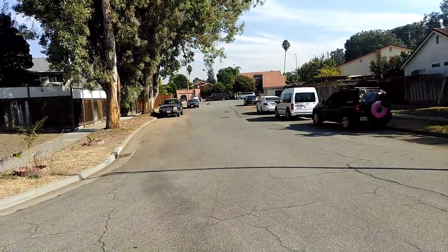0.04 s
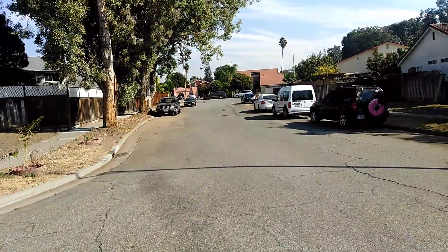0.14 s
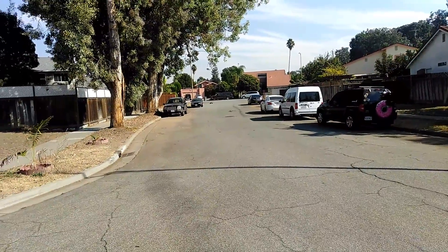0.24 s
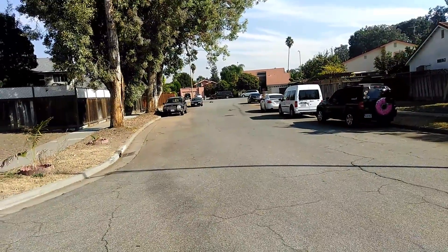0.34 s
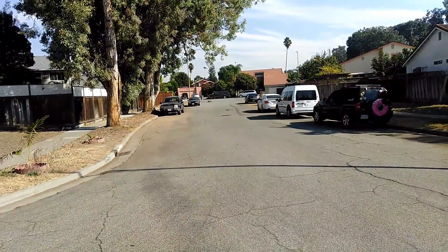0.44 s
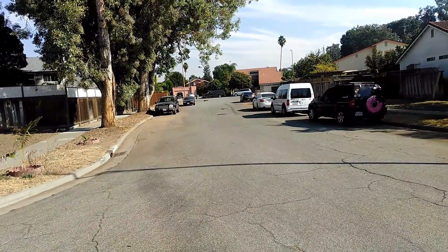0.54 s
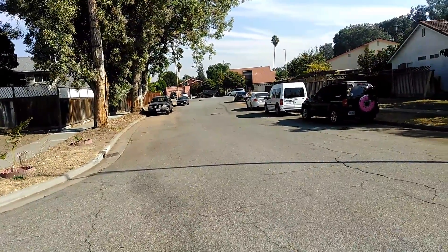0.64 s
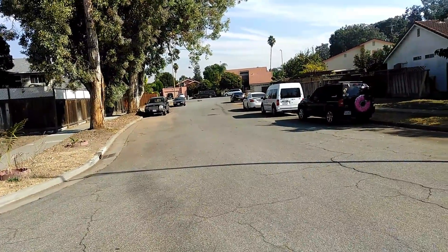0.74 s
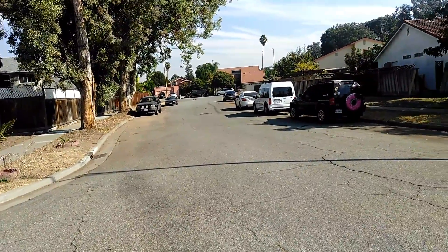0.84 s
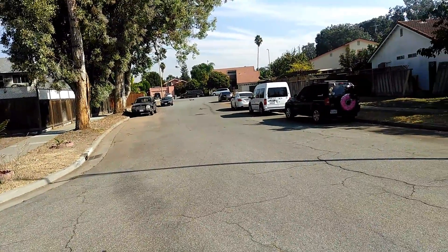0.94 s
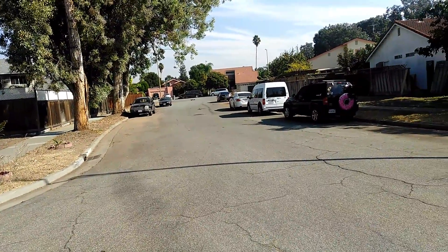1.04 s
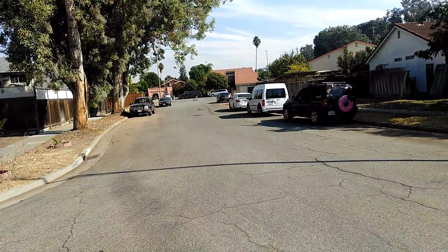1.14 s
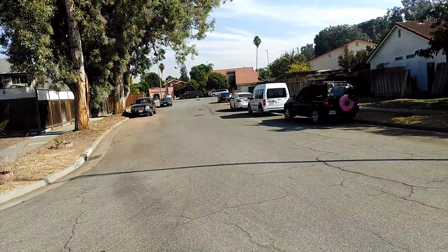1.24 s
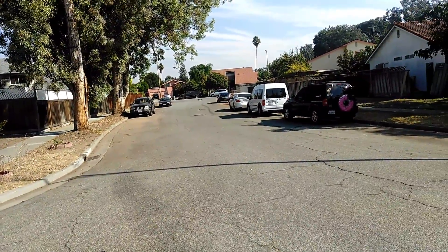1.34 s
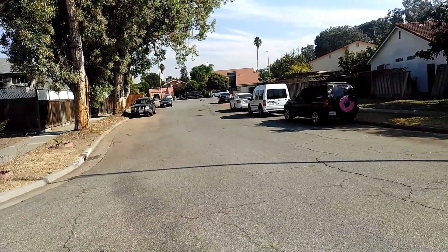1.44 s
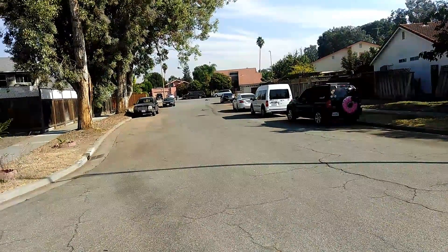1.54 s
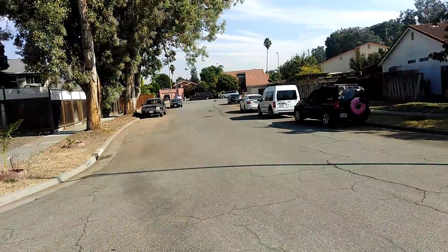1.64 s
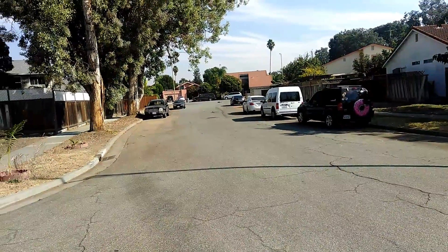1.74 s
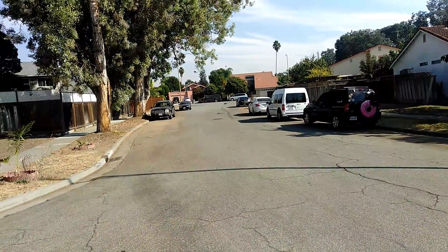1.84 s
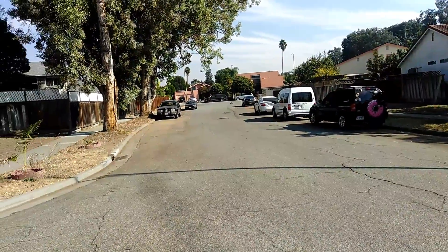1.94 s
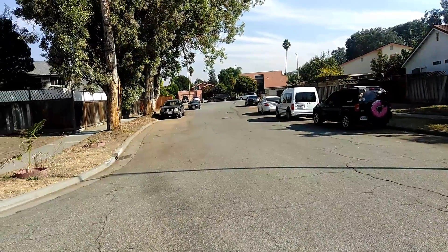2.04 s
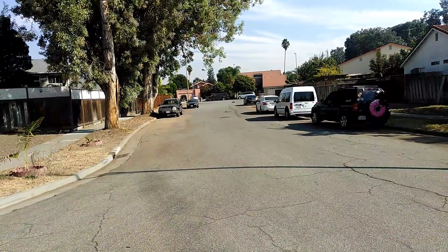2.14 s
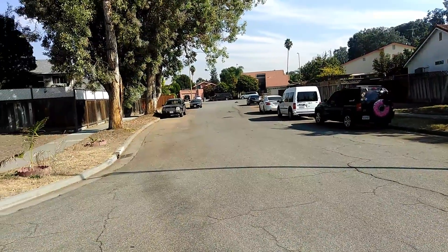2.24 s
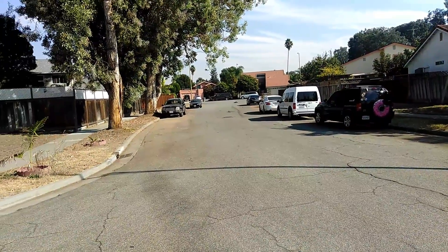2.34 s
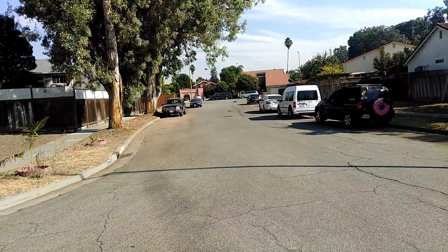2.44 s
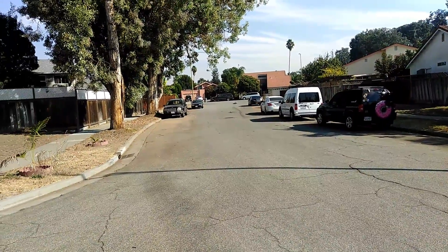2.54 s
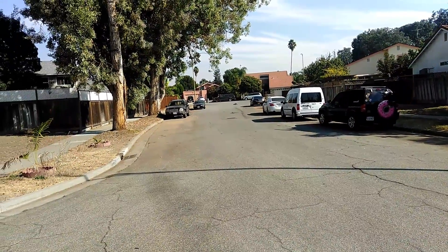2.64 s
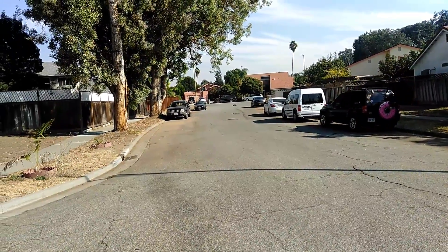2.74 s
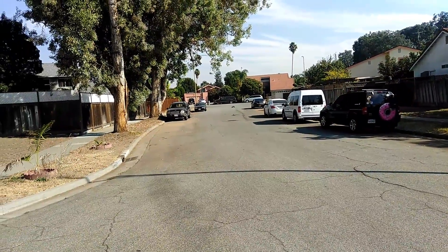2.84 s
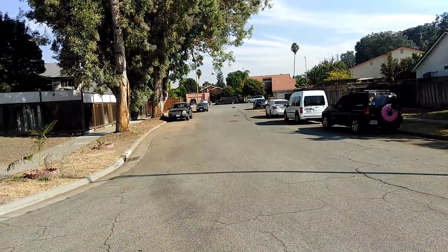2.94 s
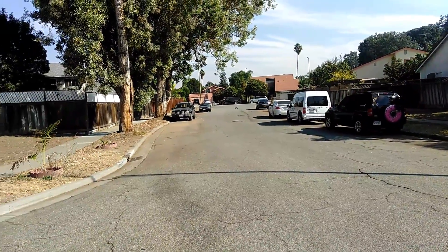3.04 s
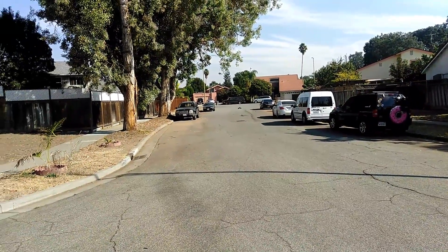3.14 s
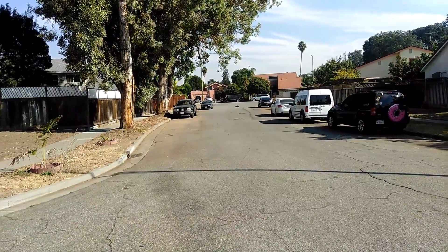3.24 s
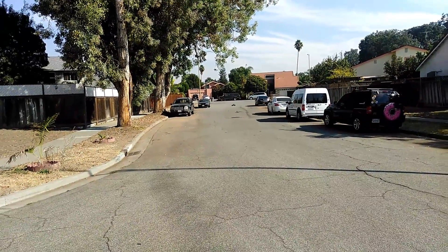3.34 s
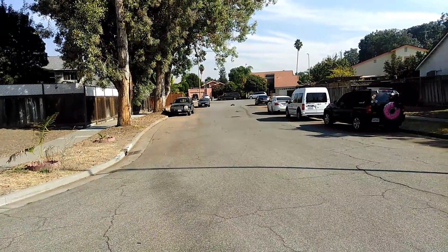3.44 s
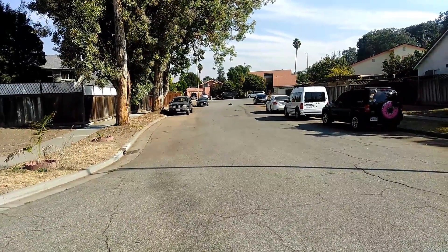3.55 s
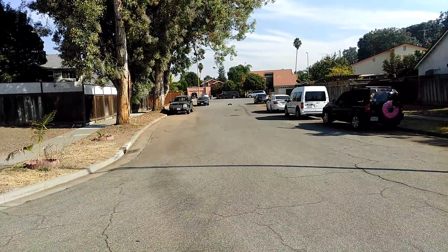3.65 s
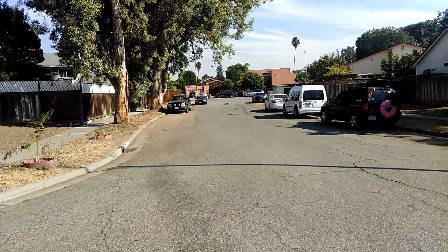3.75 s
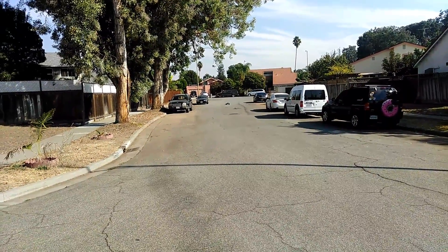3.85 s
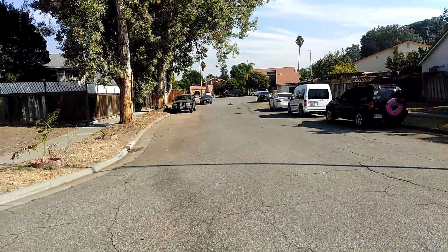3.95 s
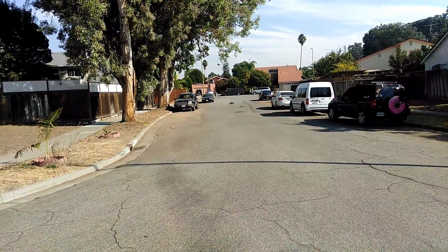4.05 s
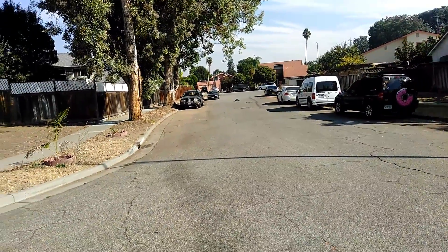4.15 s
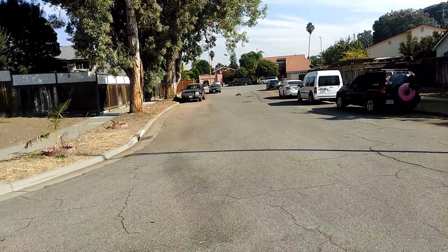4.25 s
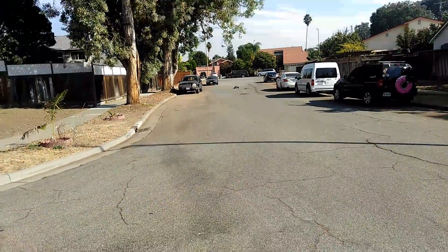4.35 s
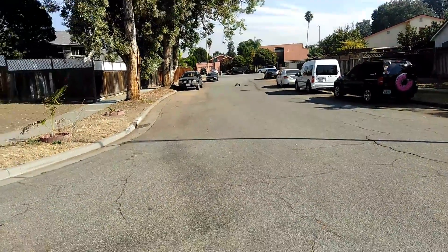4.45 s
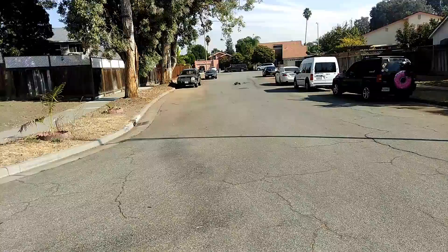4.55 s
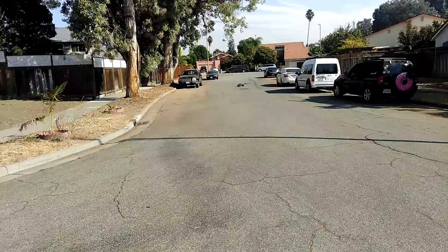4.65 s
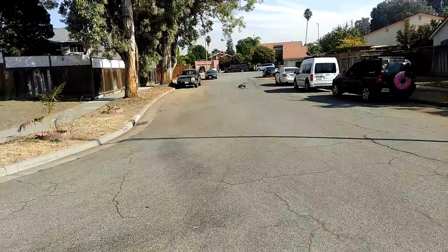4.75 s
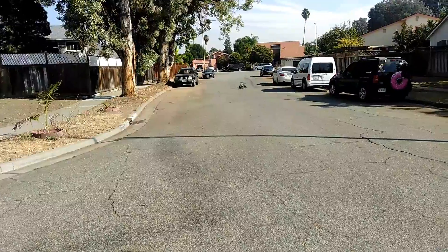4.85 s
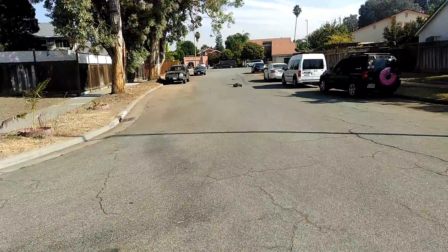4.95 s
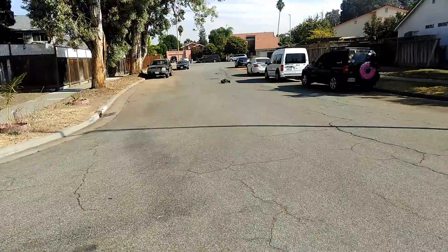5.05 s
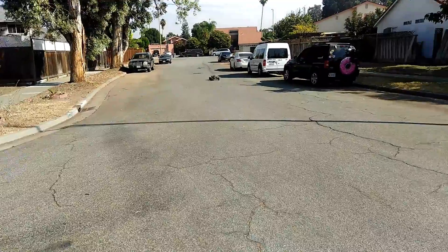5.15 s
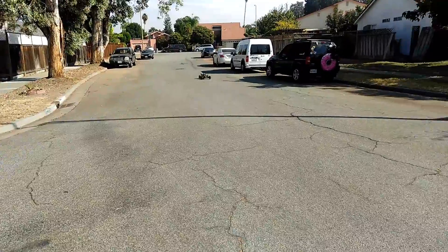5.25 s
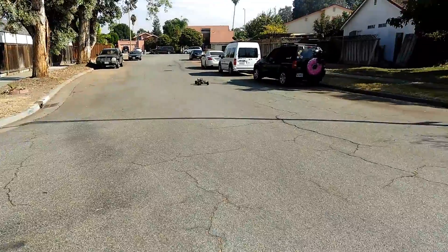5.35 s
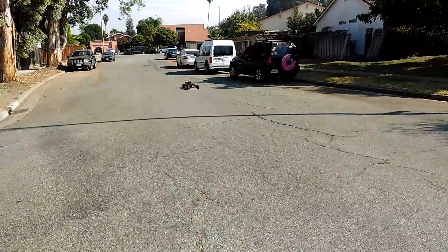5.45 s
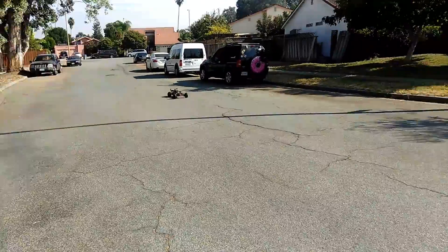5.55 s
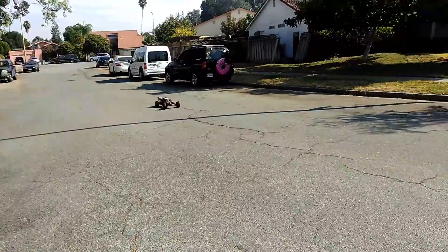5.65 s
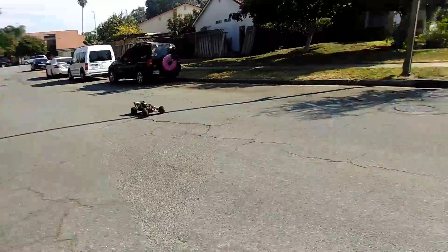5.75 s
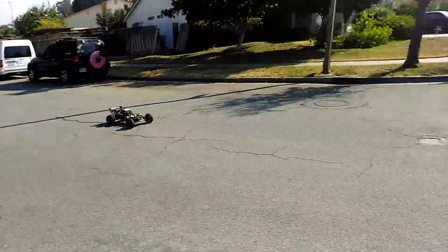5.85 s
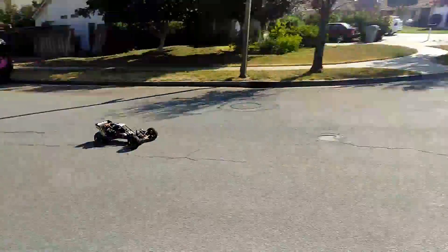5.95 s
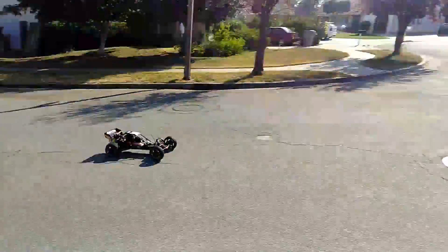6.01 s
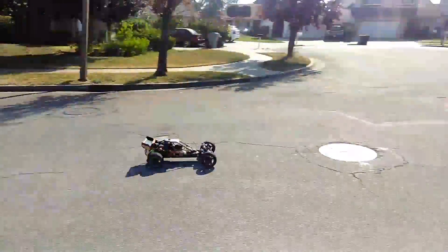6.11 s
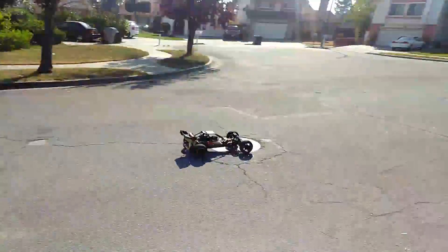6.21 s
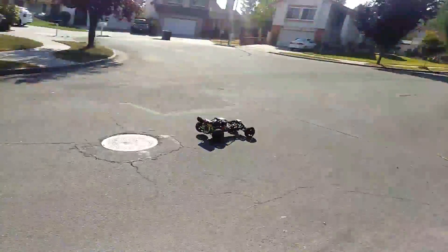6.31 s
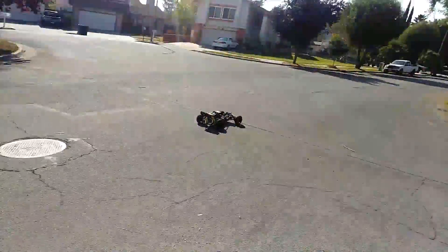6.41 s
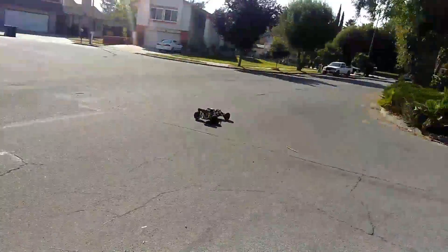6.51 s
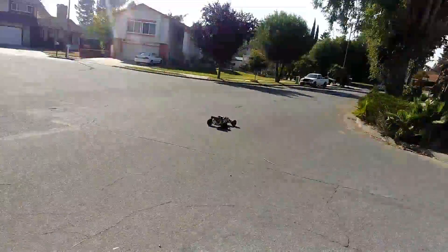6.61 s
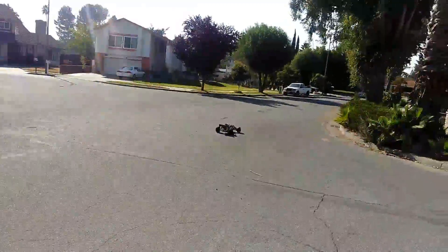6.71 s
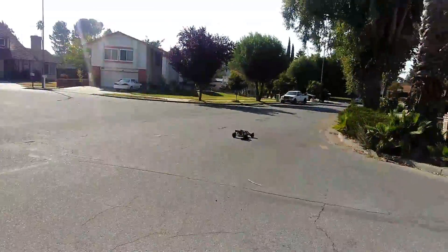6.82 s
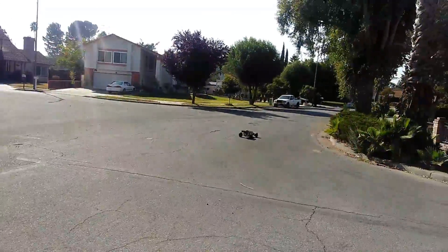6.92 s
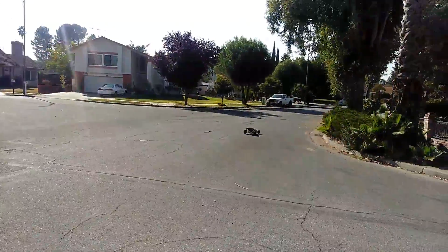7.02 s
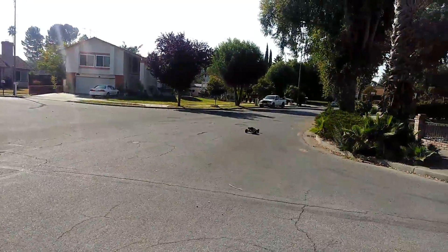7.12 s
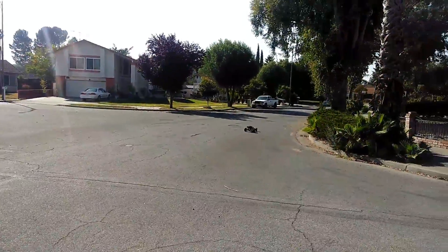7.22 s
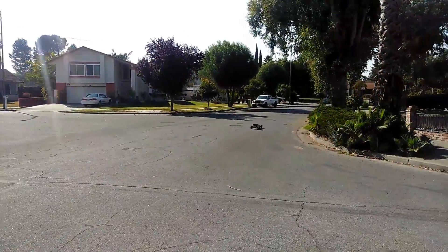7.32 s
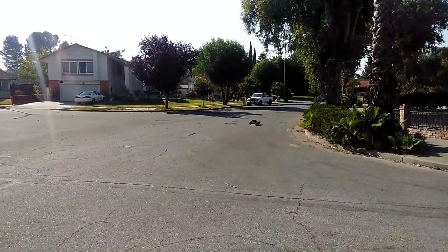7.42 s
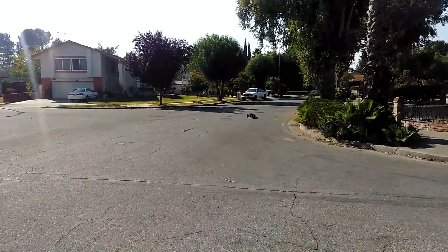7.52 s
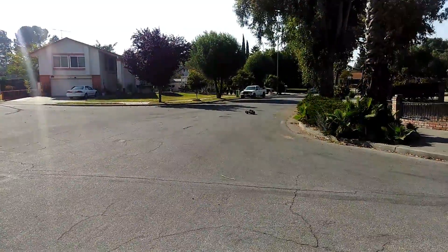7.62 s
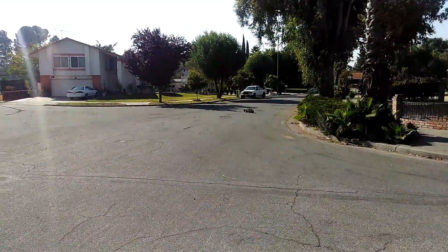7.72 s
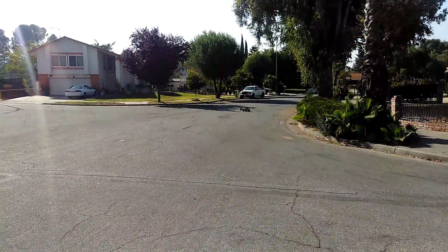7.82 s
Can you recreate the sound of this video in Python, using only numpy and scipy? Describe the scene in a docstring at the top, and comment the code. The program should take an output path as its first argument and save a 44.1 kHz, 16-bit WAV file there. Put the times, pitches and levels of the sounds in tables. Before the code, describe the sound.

Outdoors on a quiet house-lined street, a dull murmur of traffic and leaves with a faint steady mid-low hum and light breeze. From 0 to 2 seconds a distant small two-stroke engine sputters: isolated dry pops, short uneven runs of firings, strongest around 0.5 to 0.85, with a thin brake squeal near 0.6, all ringing off the houses. At about 2.1 the throttle snaps open with a gulp and the pitch jumps up. From 2.3 to 5.5 the buzz climbs, hollow and echoing at first, then louder, brighter and raspier, wavering with reflections. Around 5.9 to 6.3 it screams past close, loudest, with low wind thumps and tyre roar, its pitch sliding down. Brief shrill metallic ringing comes at 6.8 to 7.0. It recedes, lower and weaker, the street echo returning; treble vanishes after 7.5, leaving a dull drone that swells slightly until 7.9.

```python
"""A town murmurs and hums while a far two-stroke model buggy sputters, firing singly and in short runs.
Its brake sings, then the throttle opens and it races past the microphone and away along an echoing street.
Exhaust pulses and gas noise pass a tuned pipe whose colour turns with the buggy; low orders sound as tones.
Noise makes the tyres, the breeze and the cracks of single firings. The two microphone channels take direct
sound in opposite polarity and overload softly near full scale."""
import sys
import numpy as np
from scipy import signal
from scipy.fft import rfft, irfft, next_fast_len
from scipy.io import wavfile
from scipy.ndimage import uniform_filter1d, map_coordinates

SR = 44100
rng = np.random.default_rng(int(sys.argv[2]) if len(sys.argv) > 2 else 0)


def persist_wave(psi):
    """Save psi, clipped to +-1, as 16-bit WAV."""
    counts = np.round(np.clip(psi, -1, 1) * 32767).astype(np.int16)
    wavfile.write(sys.argv[1], SR, np.atleast_2d(counts).T)


N = 347269
TIME = np.arange(N) / SR

# Microphone. Each row: time in seconds, left level over right in dB.
PAN = [(0, 5.5), (2.3, 5.5), (3.5, 6), (4.5, 4.5), (5.3, 4.5), (5.75, 2), (6.3, 2), (6.6, 3), (7.1, 6),
       (7.87, 4)]
# Shading of the right port. Each row: frequency in Hz, gain in dB.
SHADE = [(4000, 0.5), (6000, -2), (8000, -14), (11000, -7.5), (15000, -6.5)]
# Likeness of the channels. Each row: frequency in Hz, left-right correlation (-1 to 1).
ALIKE = [(100, -0.78), (300, -0.978), (650, -0.97), (1300, -0.59), (3000, -0.46), (7000, -0.067),
         (15000, -0.24)]
TOP_HZ = 15676  # band limit

# Town murmur of traffic and leaves. Each row: frequency in Hz, relative level in dB per Hz.
TOWN = [(60, -4), (130, -3), (280, -2), (400, -9), (650, -4), (1000, -8), (1600, -14), (2500, -23),
        (4500, -29), (8000, -32), (11000, -39), (15000, -43)]
# Distant machines that drone and beat. Each row: frequency in Hz, mean level in dB.
HUM = [(279.9, -55.5), (263.5, -57.5), (172.3, -67)]
HUM_RISE_S = .35  # fade-in
HUM_BEHIND_DB = -24  # the drone is shaded once the microphone has swung after the buggy
# Colour of the breeze. Each row: frequency in Hz, relative level in dB per Hz.
BUFFET = [(15, -36), (35, -9.5), (55, 0), (85, 0), (130, -9), (220, -17), (500, -25.5), (2000, -84)]
# Gusts on the ports. Each row: centre in seconds, peak level in dB, bell width in seconds.
GUSTS = [(.85, -43, 0.23), (1.42, -42, 0.23), (2.75, -33.5, 0.15), (3.15, -33.5, 0.2), (3.68, -32, 0.051),
         (5.3, -41.5, 1.56), (5.97, -19.5, 0.06), (6.12, -17, 0.04), (6.43, -19.5, 0.074),
         (6.7, -33.5, .09), (7.43, -31, 0.12), (7.7, -41, 0.068)]
CALM_DB = -50.5  # buffeting between gusts

# Street decay. Each row: frequency in Hz, t60 in seconds.
STREET = [(200, 0.99), (1500, 0.37), (5000, 0.72), (12000, 0.15)]
# Gain of the street's answer. Each row: time in seconds, gain in dB.
ECHO = [(2.2, -6), (3.6, -5), (4.1, 1), (5.75, -1), (6.1, -11), (6.5, -8), (6.9, -6), (7.3, -2), (7.87, -5)]
DIFFUSE_DB = -4  # diffuse tail against distinct echoes
# Path of the buggy. Each row: time in seconds, metres along the street from the microphone.
ROUTE = [(2.2, -42), (3, -38), (3.6, -33.5), (4.1, -28.5), (4.6, -22.5), (5.75, -5.5), (6.15, 0), (6.5, 4),
         (7, 9), (7.87, 16)]
LANE_M = 4  # how far to the side the buggy passes
FRONTS_FROM_M, FRONTS_TO_M = -75, 25  # the stretch lined with house fronts and parked cars
FRONTS_SIDE_M = 11  # their mean distance to the side
# Narrow cancellations; the earlier ones cancel against the reflection off the road. Each row: centre in
# seconds, # bell width in seconds, frequency in Hz, half width in Hz, depth in dB.
NOTCHES = [(5.5, 0.21, 3018, 181, -17), (6.41, 0.038, 2145, 225, -23), (6.8, 0.092, 4170, 230, -20)]

# Speed of the run. Each row: time in seconds, firing rate as heard in Hz, before the wind-down excess.
SPEED = [(2.04, 63.45), (2.1, 91.9), (2.15, 127.9), (2.205, 158.5), (2.27, 168.2), (2.33, 169.6),
         (2.44, 167.3), (2.55, 175.5), (2.64, 185.1), (2.76, 188.2), (2.83, 188.8), (2.86, 196.2),
         (2.96, 192.2), (3.04, 198.9), (3.18, 212.7), (3.29, 215.1), (3.36, 212.1), (3.47, 218.7),
         (3.88, 254.9), (4.2, 281.2), (4.55, 304.4), (4.75, 308.4), (5.06, 318), (5.14, 327.1), (5.19, 311),
         (5.26, 319.1), (5.33, 313.7), (5.55, 322.7), (5.8, 317), (5.87, 309.1), (5.93, 294.4),
         (6.03, 271.1), (6.1, 270.6), (6.17, 256.3), (6.28, 245), (6.35, 239.2), (6.43, 224.6),
         (6.49, 202.9), (6.54, 212), (6.6, 212), (6.67, 199.9), (6.8, 195.8), (6.93, 192.4), (7.2, 176.2),
         (7.48, 164.4), (7.87, 142.1)]
WIND_DOWN_HZ, WIND_DOWN_S = 67.96, .8  # excess rate sinking towards idle, time constant
OPEN_S, OPEN_LAG_S = 2.05, .06  # the throttle opens; how fast the sound follows
CLEAR_LAG_S = .07  # how fast the firing clears after that
WAVER, IDLE_WAVER = .002, .035  # relative hunting of the speed: always, and extra while shut
JITTER_TURNS = .0021  # wandering of the firing phase
# Side shown. Each row: time in seconds, heading (0 tail, 1 turning, 2 nose, 3 flank, 4 tail).
HEADING = [(0, 1.5), (1.85, 0.5), (2.1, 1.1), (2.8, 1), (3.7, 1.5), (5.85, 4), (6.05, 3.5), (6.35, 4),
           (6.6, 4)]
# Buggy loudness. Each row: time in seconds, level in dB with the throttle open.
LEVEL = [(2.2, -30), (2.55, -30), (2.85, -28), (3.4, -28.5), (3.95, -26), (4.22, -27.5), (4.45, -22.5),
         (4.8, -20.5), (5.1, -19), (5.9, -13), (6.25, -14.5), (6.7, -18.5), (7.05, -23.5), (7.35, -28.5),
         (7.87, -23)]
# Treble against the pipe's bark. Each row: time in seconds, level in dB.
TREBLE = [(2.2, -9), (2.9, -5), (3.5, -1), (4.5, 4), (5.6, 7.5), (6.1, 3.5), (6.7, 0.5), (7.33, -0.5),
          (7.55, -13.5), (7.8, -27.5)]
SHUT_BARK_DB, SHUT_RASP_DB, SHUT_HISS_DB = -23, -40.5, -37  # change of each band with the throttle shut
RASP_DB, RASP_FOLLOWS = 3.5, 0.41  # rasp over bark; its share of the treble's swing
TAIL_RASP_DB = -4  # the rasp is weaker from behind
ROUGH_IDLE, ROUGH_NOSE, ROUGH_TAIL = .8, .17, .06  # power share of gas noise in the exhaust

# Single disc note. Each row: frequency in Hz, relative level in dB per Hz.
BRAKE = [(2500, -49), (2760, -10), (2840, 4), (2920, -11), (3080, -30), (3190, -16), (3350, -50)]
# Braking. Each row: start in seconds, length in seconds, level in dB.
BRAKING = [(.57, .19, -48.5)]
# Faint hiss. Each row: frequency in Hz, relative level in dB per Hz.
HISS = [(1000, -22), (2000, -6), (5000, -10), (8500, 5), (12000, -20)]

# Short runs of firings at low throttle. Each row: start in seconds, length in seconds, level in dB.
BLIPS = [(0, 0.026, -46), (.57, 0.2, -42), (.81, 0.035, -38.5), (1.38, 0.061, -45.5), (1.66, 0.038, -52.5),
         (1.88, .12, -53)]
# Single firings while coasting. Each row: start in seconds, peak in dB before the layer gain.
STRAYS = [(.26, -33), (0.4, -33.5), (.536, -17.5), (0.575, -23), (.635, -30), (.672, -23), (0.706, -24.5),
          (.754, -29), (.812, -22.5), (.835, -27.5), (1.083, -38), (1.306, -22.5), (1.384, -29),
          (1.745, -36)]
# Pipe colour from far away. Each row: frequency in Hz, relative level in dB per Hz.
FAR_PIPE = [(300, -3), (550, -3.5), (850, 4.5), (1080, -4.5), (1300, -1.5), (1620, -3), (1850, -12),
            (2050, -22), (2350, -7.5), (2700, -11.5), (3050, -12.5), (3200, -8.5), (3400, -21), (3700, -19),
            (4300, -24.5), (5500, -28), (6600, -19.5), (8300, -23), (11500, -43), (15000, -50)]
# Crack of a single firing. Each row: frequency in Hz, relative level in dB per Hz.
TICK = [(600, -14), (1500, 10), (3500, 1), (5300, -14), (7000, -4), (9000, -7), (12000, -23), (15000, -30)]
ECHO_DB, TICK_DB, TICK_T60 = -1, -13, .012  # gains of its echo and crack; decay of the crack in s

# Tyre roar. Each row: frequency in Hz, relative level in dB per Hz.
TYRES = [(60, -30), (150, 7), (300, -3), (600, 10.5), (800, -25), (1200, 12), (3000, -88)]
# Intake throat. Each row: frequency in Hz, relative level in dB per Hz.
THROAT = [(400, -48), (620, 9), (850, 3), (1150, 11), (1400, -18), (2200, -45)]

# Flaring orders. Each row: centre in seconds, order, level at the peak in dB, bell width in seconds.
FLARES = [(2.42, 5, -33, 0.14), (2.35, 20, -43.5, .08), (3.75, 4, -34.5, 0.21), (4.6, 4, -32, 0.6),
          (4.42, 12, -31, 0.069), (4.7, 11, -35, 0.2), (4.48, 5, -32.5, 0.063), (5.2, 11, -30, 0.49),
          (5.4, 28, -26, 0.054), (5.6, 25, -23, 0.13), (5.618, 26, -36, 0.29), (5.95, 3, -27, 0.05004),
          (6.06, 5, -15.5, 0.062), (6.08, 13, -21, 0.12), (6.11, 10, -15, 0.056), (6.21, 12, -8, 0.085),
          (6.329, 25, -17.5, 0.043), (6.4, 16, -15, 0.027), (6.62, 18, -24.5, 0.059),
          (6.66, 5, -31.5, 0.11), (6.82, 8, -23, 0.16), (7.15, 4, -35, 0.17), (6.85, 12, -32.5, 0.19),
          (7.4, 7, -35, 0.11), (7.57, 15, -29, 0.021), (7.64, 19, -35.5, 0.047), (7.739, 16, -27, 0.044),
          (7.839, 13, -31.5, 0.07)]
# Chassis ringing. Each row: start in seconds, length in seconds, level in dB.
SHRILLS = [(6.79, .13, -17.5), (6.92, 0.069, -0.5)]
# Chassis colour. Each row: frequency in Hz, relative level in dB per Hz.
CHASSIS = [(3000, -53), (5000, 4.5), (6300, 7.5), (6950, 17.5), (7400, 8), (7950, 14.5),
           (8500, -9), (14000, -11)]

# Clean low orders. Each row: order, dB at mid speed, dB gained per octave of speed,
# dB gained from behind.
ORDERS = [(1, -1, 4.5, 3), (2, -1, 4.5, -11), (3, -6.5, 3, -4), (4, -2.5, 15, -4), (5, 0.5, -2.5, -9.5)]
MID_HZ = 250  # mid speed, as a firing rate
# Pipe transmission of the low orders. Each row: frequency in Hz, gain in dB.
PIPE = [(210, -19), (270, -6.5), (315, -1.5), (390, 0), (520, -3), (630, 0.5), (750, -3), (840, 4),
        (950, -0.5), (1230, -4.5), (1340, -6), (1520, -6.5), (1620, 5)]

# Exhaust colour from each side. Each row: frequency in Hz, relative level in dB per Hz.
TURNING = [(600, 4), (850, 11), (1000, 5.5), (1200, -2), (1450, 0.5), (1750, -1), (1950, -1), (2150, -15.5),
           (2400, -7), (2700, -9.5), (3100, -13), (3400, -6.5), (3650, -13.5), (4000, -17), (5500, -21),
           (7500, -15.5), (9500, -21), (12000, -33), (15000, -58)]
NOSE = [(760, 9), (950, 9), (1250, 10.5), (1600, -11.5), (2100, -1.5), (2700, 3.5), (3170, 2.5), (3450, 10),
        (3750, 1), (4200, 1), (5400, -6), (7000, -0.5), (9000, -2.5), (11500, -13), (15000, -30)]
FLANK = [(700, 10), (1050, 8), (1380, 17), (1900, -2), (2500, -5), (3000, 5), (3600, 4.5), (4600, -5),
         (5900, -8), (7000, -3.5), (8300, -0.5), (11000, -9.5), (15000, -33)]
TAIL = [(650, 21.5), (850, 9.5), (1100, 6), (1350, -1), (1580, 5.5), (1950, -4), (2400, -3), (2900, 4),
        (3450, 1), (4400, -11.5), (5400, -11), (7000, -5.5), (9000, -5.5), (11000, -12), (15000, -12.5)]
# Tilt of the gas puffs. Each row: frequency in Hz, gain in dB.
PUFF_TILT = [(700, -6), (1500, -4), (3000, 1), (5000, 7), (8000, 6), (12000, 7)]
# Bark, rasp and hiss. Each row: lower edge in Hz, upper edge in Hz.
BANDS = [(650, 2200), (2200, 5000), (5000, 15500)]


def amp(db):
    """Amplitude ratio of a level in dB."""
    return 10 ** (np.asarray(db) / 20)


def unit(x):
    """Normalisation to rms 1."""
    return x / np.sqrt(np.mean(x ** 2) + 1e-20)


def along(points, hz):
    """Interpolation of (Hz, value) points on a logarithmic frequency axis."""
    f, v = np.transpose(points)
    return np.interp(np.log(hz + 1), np.log(f + 1), v)


def curves(rows):
    """Linear interpolation in time: one value per sample for each column after the time."""
    s, *cols = np.transpose(rows)
    return [np.interp(TIME, s, c) for c in cols]


def wobble(rate):
    """Band-limited fluctuation: a smooth random curve with rate knots a second."""
    knots = rng.standard_normal(int(N * rate / SR) + 4)
    return map_coordinates(knots, [TIME * rate], mode="nearest")


def noise_pair():
    """White noise, independent in two channels."""
    return rng.standard_normal((2, N))


def filtered(x, response):
    """Linear filtering: the spectrum times a response of frequency."""
    m = next_fast_len(N + 8192)  # room for the filter's tail
    return irfft(rfft(x, m) * response(np.fft.rfftfreq(m, 1 / SR)), m)[..., :N]


def coloured(x, spectrum):
    """Spectral shaping by a (Hz, dB) colour, at rms 1."""
    return unit(filtered(x, lambda hz: amp(along(spectrum, hz))))


def steady(x):
    """Level equalisation: slow swells are divided out to rms 1."""
    power = uniform_filter1d(np.mean(x ** 2, axis=0), size=4000)
    power = uniform_filter1d(power, size=4000)
    return x / np.sqrt(np.abs(power) + 1e-12)


def swell(s, width):
    """Gaussian envelope: a bell-shaped rise and fall around a moment."""
    return np.exp(-.5 * ((TIME - s) / width) ** 2)


def bursts(rows, attack_s, release_db_per_s):
    """Attack, hold and exponential release for each (start, length, dB) row; the strongest prevails."""
    envelopes = []
    for s, length, db in rows:
        attack = np.clip((TIME - s) / attack_s, 0, 1)
        envelopes.append(attack * amp(db - release_db_per_s * np.maximum(TIME - s - length, 0)))
    return np.max(envelopes, axis=0)


def blows(rows, t60):
    """Impulsive excitation: a sudden rise and exponential fall for each (s, peak dB) row."""
    return sum((TIME >= s) * amp(db - 60 * np.clip((TIME - s) / t60, 0, 3)) for s, db in rows)


def ports(direct, scattered):
    """Channel polarity: direct sound arrives in opposite polarity, scattered sound in like polarity."""
    turn = lambda hz: np.arccos(np.clip(along(ALIKE, hz), -.99, .99)) / 2
    mid = filtered(scattered, lambda hz: np.cos(turn(hz)))
    side = filtered(direct, lambda hz: np.sin(turn(hz)))
    return np.array([mid + side, mid - side])


def facing(pair):
    """Acoustic shading: the left port faces the buggy and the right one is shaded."""
    left = amp(curves(PAN)[0])
    right = filtered(pair[1], lambda hz: amp(along(SHADE, hz)))
    return np.array([left * pair[0], right]) / np.sqrt((1 + left ** 2) / 2)


def voiced(x, spectrum):
    """Spectral shaping that preserves power: a pair heard at the ports, at its own rms."""
    return facing(unit(ports(*coloured(x, spectrum)))) * np.sqrt(np.mean(x ** 2))


def buffeting():
    """Power addition of gusts over a calm: the strength of the breeze."""
    gusts = sum((amp(db) * swell(s, width)) ** 2 for s, db, width in GUSTS)
    return np.sqrt(amp(CALM_DB) ** 2 + gusts)


def air(gust_db=4.0):
    """Superposition of broadband town noise, beating hums and turbulent wind on the microphone."""
    town = amp(-54) * coloured(ports(*noise_pair()), TOWN)
    hum = 0
    for hz, db in HUM:
        level = amp(db + 2.5 * wobble(9)) * np.sqrt(2)
        cycles = hz * TIME + rng.random((2, 1)) / 4  # the channels start up to a quarter cycle apart
        hum = hum + level * np.sin(2 * np.pi * cycles + .55 * wobble(22))
    mid, side = coloured(noise_pair(), BUFFET) * [[.8], [1]]
    breeze = unit(np.array([mid + side, mid - side]) * amp(gust_db * wobble(11)))
    hum_gain = np.minimum(1, TIME / HUM_RISE_S) * amp(HUM_BEHIND_DB * leaving())
    return facing(town + hum_gain * hum) + buffeting() * breeze


def echoes(x, t60s):
    """Diffuse reverberation: noise decaying by frequency, as a tail of energy 1."""
    hz, _, z = signal.stft(rng.standard_normal(SR // 2), SR, nperseg=256)
    t = np.arange(z.shape[1]) * 128 / SR
    decay = amp(-60 * t / along(t60s, hz)[:, None])
    tail = signal.istft(z * decay, SR, nperseg=256)[1]
    return signal.fftconvolve(x, tail / np.linalg.norm(tail))[:N]


def rebounds(x, count=28):
    """Doppler-shifted reflection: echoes from behind the buggy arrive lower, those from ahead higher."""
    place = uniform_filter1d(curves(ROUTE)[0], size=12000, mode="nearest")
    straight = np.hypot(place, LANE_M)
    fronts = np.linspace(FRONTS_FROM_M, FRONTS_TO_M, count)
    out = 0
    for front, (shift, setback) in zip(fronts, rng.random((count, 2))):
        up = front + 2 * shift
        across = FRONTS_SIDE_M * (.5 + setback)
        path = np.sqrt((place - up) ** 2 + (across - LANE_M) ** 2) + np.hypot(up, across)
        delay = (path - straight) / 343  # behind the direct sound
        out = out + np.interp(TIME - delay, TIME, x) * straight / path
    return steady(out[None])[0]


def in_street(x):
    """Direct and reverberant field of a source among house fronts; their balance shifts as it passes."""
    answer = rebounds(x) + amp(DIFFUSE_DB) * echoes(x, STREET)
    return x + amp(curves(ECHO)[0]) * answer


def multipath(x, direct, rate, cell_hz=180):
    """Interference of shifting paths off road and parked cars: each partial swells and fades alone."""
    hz, t, z = signal.stft(x, SR, nperseg=1024)
    where = np.meshgrid(hz / cell_hz, t * rate, indexing="ij")
    knots = rng.standard_normal((2, 200, 120))
    real, imag = (map_coordinates(k, where, mode="mirror") for k in knots)
    paths = real + 1j * imag
    return unit(signal.istft(z * (direct + paths), SR, nperseg=1024)[1][:N])


def outdoors(x):
    """Multipath propagation: the source and its echoes reach both ports over shifting reflections."""
    heard = in_street(x)
    direct = multipath(heard, direct=2.6, rate=7)
    scattered = multipath(heard, direct=1.1j, rate=9)
    return unit(ports(direct, scattered))


def cancelled(x):
    """Destructive interference: narrow bands fade out for a while; the earlier ones cancel against their
    reflection off the road."""
    for s, width_s, centre, width, db in NOTCHES:
        band = filtered(x, lambda hz: np.exp(-((hz - centre) / width) ** 4))
        x = x - (1 - amp(db)) * np.minimum(1, 2 * swell(s, width_s)) * band
    return x


def shut(lag_s=OPEN_LAG_S):
    """Exponential relaxation: 1 while the throttle is shut, sinking to 0 as it opens."""
    return np.exp(-np.maximum(TIME - OPEN_S, 0) / lag_s)


def firing_rate():
    """Firings a second: exponential wind-down towards idle, then the run."""
    return curves(SPEED)[0] + shut() * WIND_DOWN_HZ * np.exp(-TIME / WIND_DOWN_S)


def crank():
    """Integration of rate to crank angle in turns, with hunting speed and wandering firing phase."""
    hunting = WAVER * wobble(25) + IDLE_WAVER * shut(CLEAR_LAG_S) * wobble(60)
    rate = firing_rate() * (1 + hunting)
    return np.cumsum(rate) / SR + JITTER_TURNS * wobble(220)


def leaving():
    """Source directivity: 0 until the buggy shows its flank, 1 once it shows its tail."""
    return np.interp(curves(HEADING)[0], [3.5, 4], [0, 1])


def bark_db():
    """Level of the pipe's bark in dB, which other engine layers follow."""
    return curves(LEVEL)[0] + SHUT_BARK_DB * shut()


def band_levels():
    """Band balance in dB: rasp and hiss follow the treble, and all three drop with the throttle shut."""
    level, treble = curves(LEVEL)[0], curves(TREBLE)[0]
    rasp = level + RASP_DB + RASP_FOLLOWS * treble + TAIL_RASP_DB * leaving() + SHUT_RASP_DB * shut()
    return bark_db(), rasp, level + treble + SHUT_HISS_DB * shut()


def roughness():
    """Turbulence share: high at idle, moderate while the buggy heads this way, low from behind."""
    running = ROUGH_NOSE + (ROUGH_TAIL - ROUGH_NOSE) * leaving()
    return running + (ROUGH_IDLE - running) * shut(CLEAR_LAG_S)


def pops(turns, count=56, order=3):
    """Harmonic series: one sharp pulse a turn, made of the orders above the given one up to count."""
    half = np.pi * (turns % 1) + 1e-9
    upper = np.sin((2 * count + 1) * half)
    lower = np.sin((2 * order + 1) * half)
    return unit((upper - lower) / np.sin(half))


def dispersed(x, cell_hz=420, radians=1.79):
    """Dispersion: the pipe's chambers delay each frequency differently, smearing every pulse."""
    knots = rng.standard_normal(200)
    phase = lambda hz: radians * map_coordinates(knots, [hz / cell_hz], mode="mirror")
    return filtered(x, lambda hz: np.exp(1j * phase(hz)))


def brake(hiss_s=0.033, hiss_width_s=0.12, hiss_db=-64):
    """Narrow-band vibration: the brake disc sings briefly, after a faint hiss has died away."""
    hiss = coloured(ports(*noise_pair()), HISS)
    disc = coloured(ports(*noise_pair()), BRAKE) * amp(2.5 * wobble(36))
    singing = disc * bursts(BRAKING, attack_s=0.024, release_db_per_s=130)
    return facing(singing + hiss * amp(hiss_db) * swell(hiss_s, hiss_width_s))


def sputter(turns, noise=1.35, pop_db=-5, pop_t60=0.025, ring_t60=0.61, blur_t60=0.066):
    """Impulse excitation of the far street: single firings and short uneven runs ring on."""
    train = unit(amp(3 * wobble(110)) * dispersed(pops(turns)))
    firings = bursts(BLIPS, attack_s=0.0064, release_db_per_s=73) * train
    runs = np.array([echoes(firings, [(1000, blur_t60)]) for _ in range(2)])
    gas = bursts(BLIPS, attack_s=0.007, release_db_per_s=77) * noise * noise_pair()
    singles = amp(pop_db) * blows(STRAYS, pop_t60) * noise_pair()
    ring = [(1000, ring_t60), (9000, 0.37 * ring_t60)]
    answer = np.array([echoes(c, ring) for c in singles])
    cracks = amp(TICK_DB) * blows(STRAYS, TICK_T60) * noise_pair()
    body = (runs + gas) / np.hypot(1, noise) + singles + amp(ECHO_DB) * answer
    return voiced(body, FAR_PIPE) + voiced(cracks, TICK)


def tyres(level_db=-16):
    """Rolling noise: knobbly tyres roar low on the asphalt, swelling with the engine."""
    roar = coloured(ports(*noise_pair()), TYRES)
    return facing(roar * amp(bark_db() + level_db))


def gulp(turns, s=2.17, width_s=0.048, level_db=-35, noise=0.89):
    """Throat resonance: the intake gulps pulsed and noisy air as the throttle snaps open."""
    air_in = pops(turns) + noise * noise_pair()
    throat = coloured(ports(*air_in), THROAT)
    return facing(throat * amp(level_db) * swell(s, width_s))


def rings(turns):
    """Beaming and resonance: orders flare as the pipe's narrow beams pass; the chassis rings briefly."""
    whine = 0
    for s, k, db, width in FLARES:
        level = swell(s, width) * amp(db + 2.53 * wobble(60))
        whine = whine + np.sqrt(2) * level * np.sin(2 * np.pi * round(k) * turns)
    buzz = pops(turns) + 0.67 * rng.standard_normal(N)
    metal = coloured(buzz, CHASSIS)
    ringing = steady(facing(np.array([metal, -metal])))
    return whine + bursts(SHRILLS, attack_s=0.011, release_db_per_s=1000) * ringing


def drone(turns, flutter_db=2.5, fade_db=-0.5, level_db=1, unsettled_db=-18, echo_db=-11):
    """Pipe resonance: low orders swell as they cross its modes, and beat with their echoes."""
    rate = firing_rate()
    tones = 0
    for k, db, slope, behind in ORDERS:
        level = db + slope * np.log2(rate / MID_HZ) + behind * leaving() + along(PIPE, k * rate)
        level = level + flutter_db * wobble(55) + fade_db * wobble(3.9)
        tones = tones + amp(level) * np.exp(2j * np.pi * (round(k) * turns + rng.random()))
    strength = np.sqrt(np.abs(uniform_filter1d(tones.real ** 2, size=4000)))
    answer = amp(echo_db) * strength * rebounds(tones.real, count=12)
    gain = amp(bark_db() + level_db + unsettled_db * shut(CLEAR_LAG_S))
    # the quadrature of the tones serves as the scattered sound
    return facing(ports(gain * (tones.real + answer), gain * (tones.imag + answer)))


def exhaust(turns, scatter_db=1.0, gating=0.34, breakup_hz=11000):
    """Source and filter: pulses and gas puffs through a pipe whose colour turns with the heading."""
    size = amp(scatter_db * rng.standard_normal(4000))[np.abs(turns).astype(int)]  # one draw a turn
    rough = roughness()
    pulses = outdoors(dispersed(pops(turns + .5, order=5) * size))
    tone = filtered(pulses, lambda hz: 1 / np.hypot(1, hz / breakup_hz))
    gate = np.exp(-gating * (1 - shut()) * np.cos(2 * np.pi * turns))  # gas peaks with the pulses
    puffs = unit(ports(*noise_pair()) * size * gate)
    puffs = filtered(puffs, lambda hz: amp(along(PUFF_TILT, hz)))
    gas = np.sqrt(1 - rough) * tone + np.sqrt(rough) * puffs
    heading = curves(HEADING)[0]
    turned = 0
    for k, colour in enumerate([TAIL, TURNING, NOSE, FLANK, TAIL]):
        share = np.maximum(0, 1 - np.abs(heading - k))  # crossfade between neighbouring sides
        turned = turned + share * coloured(gas, colour)
    voice = facing(cancelled(turned))
    out = 0
    for (lo, hi), db in zip(BANDS, band_levels()):
        edges = lambda hz: 1 / np.sqrt((1 + (lo / (hz + 1)) ** 16) * (1 + (hz / hi) ** 16))
        out = out + amp(db) * steady(filtered(voice, edges))
    return out


def scene():
    """Superposition of all sources, the engine layers sharing one crank angle."""
    turns = crank()
    engine = exhaust(turns) + drone(turns) + gulp(turns) + rings(turns)
    return engine + tyres() + sputter(turns) + brake() + air()


def record(dry):
    """Soft saturation near full scale, then a sharp band limit."""
    limited = dry / (1 + np.abs(dry / 1.05) ** 6) ** (1 / 6)
    return filtered(limited, lambda hz: hz < TOP_HZ)


dry = scene()
out = record(dry)
persist_wave(out)
```